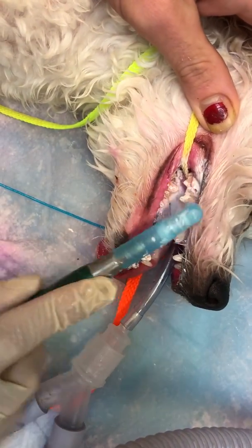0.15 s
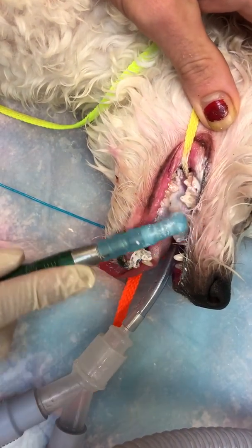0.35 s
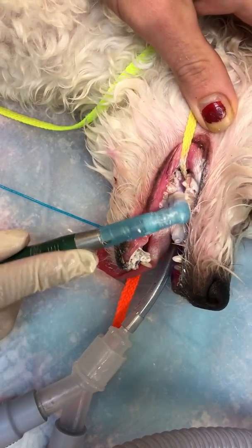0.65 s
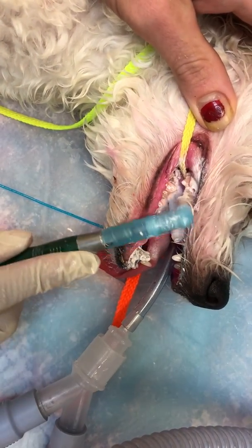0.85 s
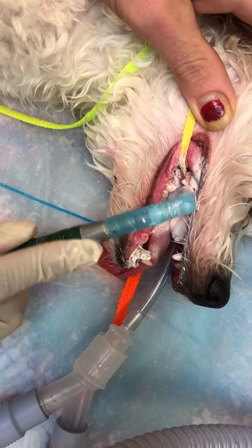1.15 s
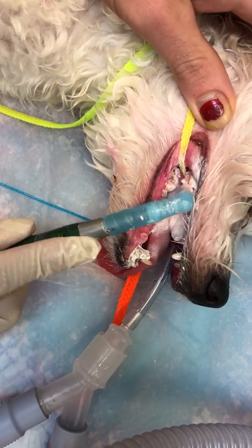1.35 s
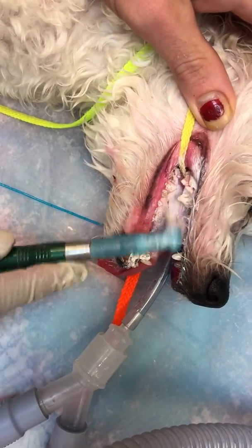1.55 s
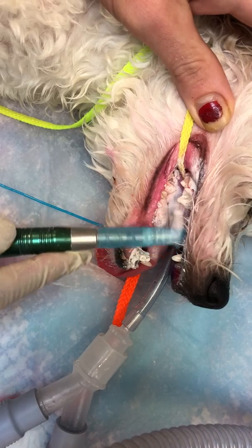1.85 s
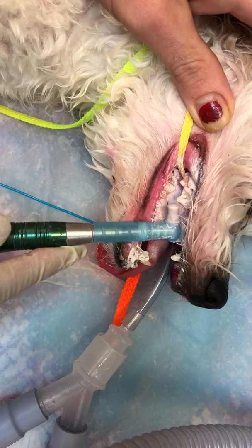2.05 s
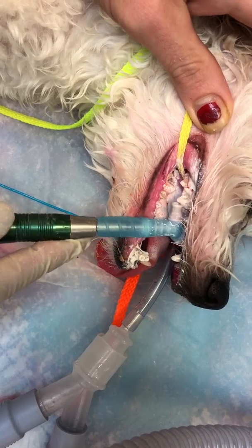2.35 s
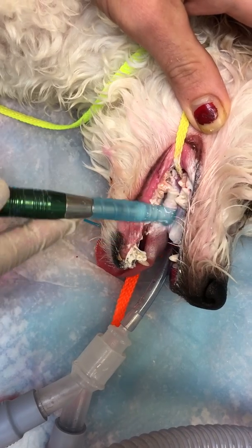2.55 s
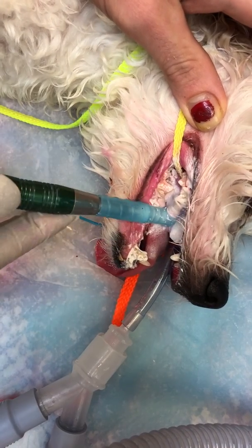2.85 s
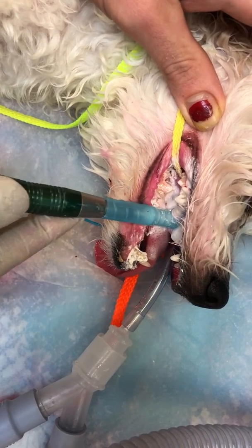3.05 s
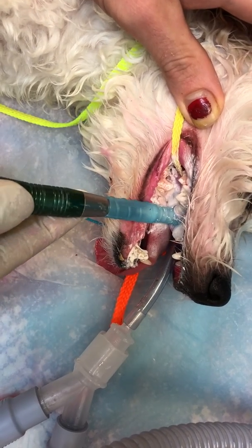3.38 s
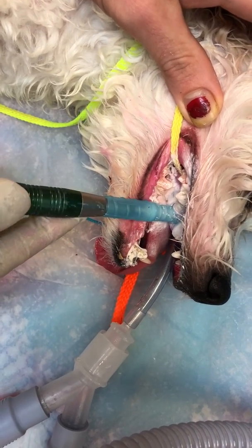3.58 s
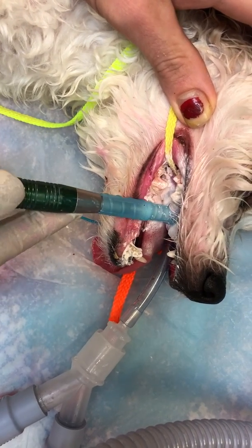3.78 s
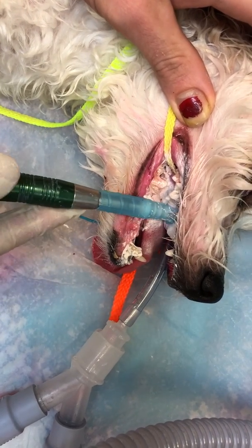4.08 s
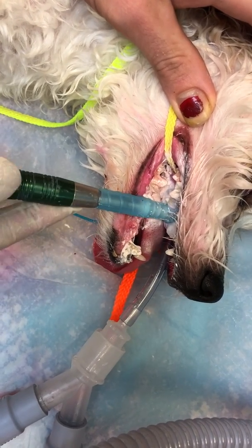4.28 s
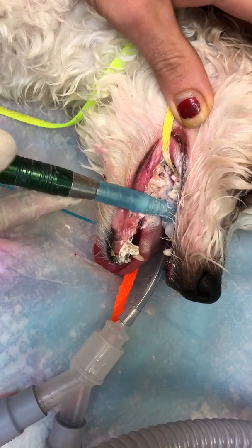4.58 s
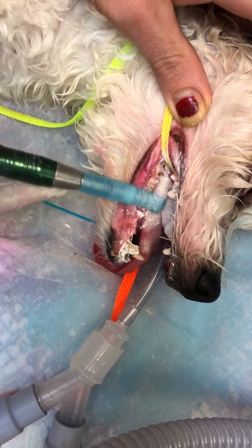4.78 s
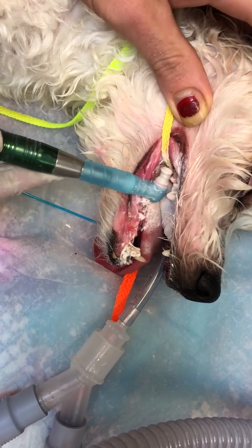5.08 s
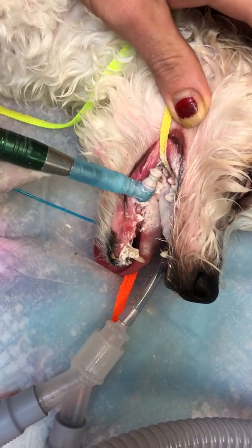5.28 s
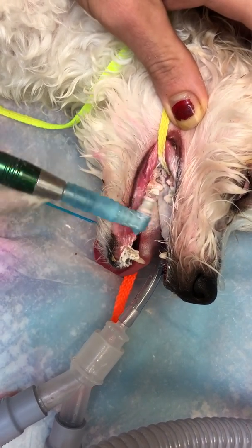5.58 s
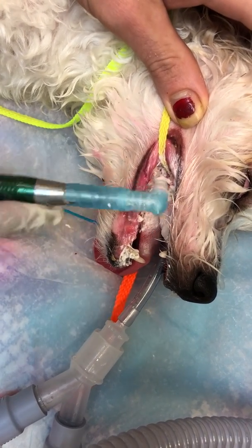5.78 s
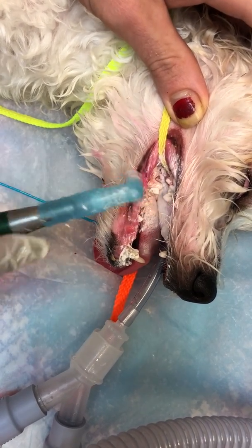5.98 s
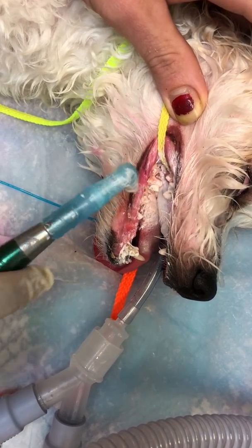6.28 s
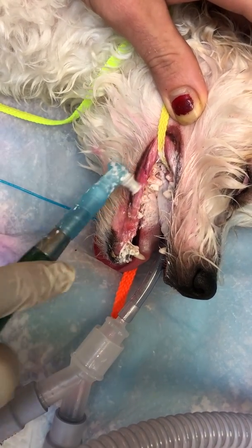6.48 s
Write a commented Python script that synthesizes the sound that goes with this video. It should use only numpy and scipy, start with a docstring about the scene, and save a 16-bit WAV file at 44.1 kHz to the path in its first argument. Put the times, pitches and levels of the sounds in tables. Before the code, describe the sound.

A shrill air-driven dental handpiece whines close by, hissing and buzzing, with fast clattering rasps as its cup presses on teeth over a low equipment hum.

```python
"""Polishing a dog's teeth

An air-driven dental handpiece whines close by: six rotor vanes chop the air, and the pitch sags under load.
Air hisses out and rings the housing, while a gear rocks the rubbing cup to and fro, with clicks
at the reversals. Behind it are a humming pump, mains hum, ventilation noise and a few soft bumps.
Tones are sine waves, hisses are shaped noise, and clicks are short blows sent through ringing bodies."""
import sys
import numpy as np
from scipy import signal
from scipy.fft import rfft, irfft
from scipy.io import wavfile
from scipy.ndimage import uniform_filter1d

SR = 44100
rng = np.random.default_rng(int(sys.argv[2]) if len(sys.argv) > 2 else 0)


def log_audio(samples):
    """Write samples as a 16-bit WAV file to the path given in sys.argv[1]."""
    # one column per channel
    frames = np.atleast_2d(samples).T
    # limit to full scale, then quantise
    limited = np.clip(frames, -1, 1)
    pcm = np.round(limited * 32767).astype(np.int16)
    wavfile.write(sys.argv[1], SR, pcm)


N = 292383
T = np.arange(N) / SR  # time in seconds

VANES, GEAR = 6, 4.75  # vanes on the rotor; rotor turns per rocking cycle of the cup
OUTWARD, RETURN, SLIP = .315, .835, .14  # where the blows fall, as a share of the rocking cycle

# exhaust hiss as the tool is turned in the hand; only its swing about the average is used: (t/s, level/dB)
EXHAUST = [(0.0, -39), (0.59, -40.5), (1.57, -39), (1.75, -42), (2.64, -35), (2.71, -33.5), (3.65, -30),
           (4.23, -31), (4.38, -30.5), (5.1, -32), (5.61, -30), (5.96, -40), (6.41, -37.5), (6.63, -38)]
# housing ring near 7 kHz; only its swing about the average is used: (t/s, level/dB)
RINGING = [(0.0, -31.5), (0.15, -31.5), (0.33, -39.5), (0.42, -33.5), (0.7, -38), (1.57, -33.5),
           (1.81, -44), (2.21, -48), (2.53, -40), (2.92, -29.5), (4.03, -29.5), (4.15, -31), (4.36, -27.5),
           (4.74, -30), (5.04, -34.5), (5.58, -32), (5.78, -42.5), (5.85, -36), (6.37, -33.5),
           (6.44, -43.5), (6.63, -43)]
# colour of the knocking plastic head and the scraping cup: (f/Hz, relative level/dB per Hz)
KNOCK = [(1000, -20.5), (2300, -18), (3300, -15.5), (4100, 1), (4800, 0.5), (5600, -5.5), (7000, -3),
         (10000, -29)]


def amp(db):
    """Turns decibels into gain."""
    return 10 ** (np.asarray(db) / 20)


def unit(x):
    """Scales a signal to an rms (average strength) of 1."""
    return x / np.sqrt(np.mean(x ** 2) + 1e-20)


def curve(rows):
    """Joins a table of (time, value) by straight lines."""
    s, value = np.transpose(rows)
    return np.interp(T, s, value)


def swing(rows):
    """How far a level curve lies above its average, in dB."""
    db = curve(rows)
    return db - db.mean()


def colour(points, hz):
    """Gain of a spectrum at the given frequencies, joined evenly in pitch."""
    f, db = np.transpose(points)
    return amp(np.interp(np.log(hz + 1), np.log(f), db))


def wander(hz):
    """Slow random drift of rms 1, moving up to about hz times a second."""
    count = N // 32 + 2  # computed at every 32nd sample, then filled in
    f = np.fft.rfftfreq(count, 32 / SR)
    slow = irfft(rfft(rng.standard_normal(count)) / (1 + (f / hz) ** 4))
    return unit(np.interp(np.arange(N) / 32, np.arange(len(slow)), slow))


def ring(x, points):
    """Passes x through a body of energy 1 with the given spectrum, which sounds only after each blow."""
    log_gain = np.log(colour(points, abs(np.fft.fftfreq(2048, 1 / SR))))
    # this choice of phase puts the energy as early as possible
    response = np.fft.ifft(np.exp(np.conj(signal.hilbert(log_gain)))).real
    return signal.oaconvolve(x, response / np.linalg.norm(response))[:N]


def noise(points, patchy_db, size=1024):
    """Noise with the given spectrum, mottled by patches that drift over time and frequency."""
    hz = np.fft.rfftfreq(size, 1 / SR)
    a, b, patches = rng.standard_normal((3, N * 4 // size + 5, len(hz)))
    patches = uniform_filter1d(patches, size=40, axis=0)  # smooth in time
    patches = unit(uniform_filter1d(patches, size=10, axis=1))  # smooth in frequency
    z = (a + 1j * b) * colour(points, hz) * amp(patchy_db * patches)
    sound = signal.istft(z.T, nperseg=size, noverlap=size * 3 // 4)[1][:N]
    return sound * np.sqrt(1.5 * SR / size)


def tone(turns, db, waver):
    """A sine partial of random phase; reflections make its strength and phase waver."""
    carrier = np.exp(2j * np.pi * (turns + rng.random()))
    fading = 1 + waver * (wander(hz=8.3) + 1j * wander(hz=20))
    fading = fading / np.sqrt(1 + 2 * waver ** 2)  # keeps the average power
    return np.sqrt(2) * amp(db) * (carrier * fading).real


def ventilation():
    """Moving air makes a steady, mostly low noise."""
    # spectrum before a small boost: (f/Hz, level/dB per Hz)
    room_points = [(25, -100), (45, -92), (60, -73.5), (110, -82), (142, -64.5), (175, -72.5), (270, -77),
                   (350, -77.5), (460, -78.5), (570, -78.5), (830, -79), (1020, -83), (1220, -78.5),
                   (1450, -87), (8000, -89.5)]
    return amp(0.4) * noise(room_points, patchy_db=1.35, size=4096)


def mains_hum():
    """Electrical equipment hums at multiples of the mains frequency."""
    # hum before a small cut: (f/Hz, level/dB)
    hum_partials = [(100, -57), (150, -64), (200, -53.5), (300, -90.5)]
    return amp(-2.0) * sum(tone(hz * T, db, waver=.05) for hz, db in hum_partials)


def pump():
    """A pump hums at whole multiples (orders) of its slightly drifting shaft speed."""
    # hum before a small cut: (order of the shaft speed, level/dB)
    shaft_orders = [(2, -59.5), (3, -69), (4, -48.5), (5, -64.5), (6, -56.5), (7, -63), (8, -45), (9, -47),
                    (10, -43.5), (11, -50.5), (12, -52.5), (13, -56), (14, -64.5), (15, -78.5), (16, -59.5),
                    (17, -65), (18, -67.5), (19, -59.5), (20, -63.5), (21, -56.5), (22, -64), (29, -60.5),
                    (30, -71), (32, -61), (33, -54.5), (34, -58.5), (35, -54), (36, -58.5), (37, -64),
                    (39, -54), (40, -84), (43, -65)]
    shaft_hz = 23.383
    turns = shaft_hz * T + 0.0023 * wander(hz=2.1)
    return amp(-1.15) * sum(tone(k * turns, db, waver=0.17) for k, db in shaft_orders)


def bumps():
    """Dull thuds: bursts of noise that swell quickly and die away, sent through a low body."""
    # soft bumps: (start t/s, level/dB, decay/s)
    bump_rows = [(2.27, -43, .08), (4.95, -30, 0.041), (4.98, -42, .03)]
    # colour of the bumped body: (f/Hz, relative level/dB per Hz)
    thud_points = [(30, -23), (60, 0), (100, -4), (170, -7), (300, -4.5), (420, -16), (1000, -19.5),
                   (2500, -50)]
    push = np.zeros(N)
    for start, db, decay in bump_rows:
        swell = np.clip((T - start) / 0.011, 0, 1)
        push += amp(db) * swell * np.exp(-np.maximum(T - start, 0) / decay)
    return ring(push * rng.standard_normal(N), thud_points)


def escaping_air():
    """Air rushing from the exhaust makes a broad hiss."""
    # colour of the air: (f/Hz, relative level/dB per Hz)
    air_points = [(1000, -23.5), (2000, -8.5), (2750, -18.5), (3400, -7.5), (6000, -3), (7700, -0.5),
                  (8400, 2), (9300, 1), (10000, 0.5), (11000, -1.5), (12300, -1), (13500, -0.5),
                  (16000, -3)]
    return amp(-33.5 + 1.34 * swing(EXHAUST)) * unit(noise(air_points, patchy_db=1.5))


def ringing_housing():
    """The air rings the housing, heard as a narrower hiss near 7 kHz."""
    # colour of the housing: (f/Hz, relative level/dB per Hz)
    housing_points = [(4500, -46), (5600, -15.5), (6200, -1.5), (7000, 4.5), (7600, -2), (8200, -9.5),
                      (9500, -40)]
    level_db = -38.5 + 0.89 * swing(RINGING) + 0.076 * swing(EXHAUST)
    return amp(level_db) * unit(noise(housing_points, patchy_db=-1.0))


def rubbing_cup(turns, knock):
    """The cup rubs, and scrapes when pressed; both swell twice a rocking cycle, first at the outward blow."""
    # colour of the rub: (f/Hz, relative level/dB per Hz)
    rub_points = [(800, -57), (1500, -11), (2200, -4.5), (3000, -4), (3600, -2), (4100, -2.5), (4900, -3),
                  (5600, -7), (6400, -11.5), (8000, -43)]
    on_teeth_s, lifted_db = (0.5, 5.8), -1.5  # the cup rubs less before and after this span
    lifted = 1. * ((T < on_teeth_s[0]) | (T > on_teeth_s[1]))
    lifted = uniform_filter1d(lifted, size=SR // 10)
    rub_db = -41.5 + 0.076 * swing(RINGING) + lifted_db * lifted
    rub = amp(rub_db) * unit(noise(rub_points, patchy_db=2.5))
    scrape = amp(-3.5 + 0.87 * swing(EXHAUST)) * knock * unit(noise(KNOCK, patchy_db=-3.0))
    stroke = 1 + 0.12 * np.cos(4 * np.pi * (turns / GEAR - OUTWARD))
    return (rub + scrape) * stroke


def pressing():
    """Strength of knock, tick and slip: each press on a tooth builds up, holds and lets go."""
    # base levels: (start t/s, length/s, knock level/dB, tick level/dB, slip as a share of the knock 0-1)
    presses = [(.07, 0.067, -40.5, -55, .1), (0.667, 0.04, -37, -40, .1), (0.945, 0.11, -42, -49, .1),
               (1.09, .08, -38.5, -49, .1), (1.356, 0.095, -40, -44, 0.2), (1.485, 0.072, -39.5, -54, 0),
               (2.62, .36, -44.5, -42, .2), (2.995, .15, -41, -52, 0.5), (3.155, 0.28, -36.5, -48, 0.9),
               (3.478, 0.275, -35, -37.5, 0.75), (3.768, .28, -38.5, -39, 1), (4.31, .22, -42, -35.5, 0.2),
               (4.605, 0.25, -42.5, -39, 0), (5.28, 0.22, -49, -51, .2), (5.71, 0.082, -56, -38, .1)]
    grip_s, release_s = .015, .02
    knock, tick, slip = np.zeros((3, N))
    for start, length, knock_db, tick_db, slip_share in presses:
        build_up = np.clip((T - start) / grip_s, 0, 1)
        held = build_up * np.exp(-np.maximum(T - start - length, 0) / release_s)
        knock += amp(knock_db) * held
        tick += amp(tick_db) * held
        slip += amp(knock_db) * slip_share * held
    return knock, tick, slip


def impacts(cycles, place, scatter, uneven_db):
    """One blow in each rocking cycle, a little uneven in time and strength; the rms is about 1."""
    count = np.arange(int(cycles[-1]))
    late, size = rng.standard_normal((600, 2))[:len(count)].T
    at = np.interp(count + place + scatter * late, cycles, np.arange(N)).astype(int)
    train = np.zeros(N)
    train[at] = unit(amp(uneven_db * np.clip(size, -2, 1))) * np.sqrt(N / len(count))
    return train


def rattle(x, decay_s, share):
    """Turns a share of each blow's energy into a short irregular chatter after it."""
    t = np.arange(SR // 40) / SR
    tail = rng.standard_normal(len(t)) * np.exp(-t / decay_s)
    chatter = signal.oaconvolve(x ** 2, tail ** 2 / np.sum(tail ** 2))[:N]
    return np.sqrt(1 - share) * x + np.sqrt(share * abs(chatter)) * rng.standard_normal(N)


def gear_ticks(cycles, tick):
    """The play in the gear closes at each reversal: metal ticks even when idle, and more under load."""
    # colour of the metal: (f/Hz, relative level/dB per Hz)
    tick_points = [(800, -33), (2300, -5), (4000, -0.5), (6500, -12.5), (8000, 1.5), (10500, 3),
                   (12500, 2.5), (14300, 0.5), (16000, 1)]
    idle = amp(-46.5 + 0.37 * swing(RINGING))
    outward = np.hypot(idle, tick)  # idle and load add as energies
    back = np.hypot(amp(2.8) * idle, amp(-4.5) * tick)
    blows = sum(strength * impacts(cycles, place, scatter=.012, uneven_db=3.0)
                for place, strength in [(OUTWARD, outward), (RETURN, back)])
    return amp(2.0) * ring(rattle(blows, decay_s=.0008, share=.6), tick_points)


def head_knocks(cycles, knock, slip):
    """Under load the plastic head knocks at each reversal and the cup slips between them."""
    blows = sum(strength * impacts(cycles, place, scatter=.01, uneven_db=-1.5)
                for place, strength in [(OUTWARD, knock), (RETURN, amp(-9.5) * knock), (SLIP, slip)])
    return amp(-0.09 * swing(EXHAUST)) * ring(rattle(blows, decay_s=0.00062, share=0.31), KNOCK)


def fade(multiple):
    """Brief fades and swells of one partial of the whine as the tool turns, in dB."""
    # (middle t/s, half width/s, multiple of the vane rate, change/dB)
    fades = [(.23, 0.058, 3, 6), (.38, .17, 1, -16), (1.48, 0.14, 2, -4.5), (1.75, 0.073, 1, -15),
             (2.86, .16, 3, 2), (2.0, .09, 4, 5), (3.17, 0.47, 2, -6.5), (3.85, 0.1, 2, -3.5),
             (5.42, 0.33, 4, 8), (5.48, 0.18, 1, 3.5), (5.65, 0.21, 2, 2), (6.31, 0.13, 2, -6.5),
             (6.55, 0.14, 2, 1)]
    return sum(db * np.exp(-((T - s) / width) ** 4)
               for s, width, k, db in fades if k == multiple)


def vane_whine(turns):
    """Six vanes chop the air, making a whine at multiples of the rate at which they pass."""
    # levels at average exhaust and ringing, before fades:
    # (multiple of the vane rate, level/dB, change/dB per dB of exhaust, change/dB per dB of ringing)
    partials = [(1, -46.5, 1.07, -0.1), (2, -39, 0.32, 0.03), (4, -50.5, .6, -.35)]
    # shrill third partial, before fades: (t/s, level/dB)
    shrill_rows = [(0.0, -38), (1.3, -36.5), (1.84, -40), (1.98, -60), (2.24, -55), (2.74, -43),
                   (3.1, -35.5), (3.98, -38), (4.18, -50), (4.42, -38), (4.52, -52), (4.8, -41), (4.9, -58),
                   (5.2, -39.5), (5.42, -37.7), (5.54, -51), (5.64, -35.5), (5.9, -31.2), (6.36, -37.5),
                   (6.62, -49)]
    exhaust, ringing = swing(EXHAUST), swing(RINGING)
    whine = tone(3 * VANES * turns, curve(shrill_rows) + fade(3), waver=.1)
    for k, db, by_exhaust, by_ringing in partials:
        level_db = db + by_exhaust * exhaust + by_ringing * ringing + fade(k)
        whine = whine + tone(VANES * k * turns, level_db, waver=0.13)
    return whine


def vane_buzz(turns):
    """Unequal vanes add a buzz at multiples of the rotor speed, which brightens as the exhaust grows."""
    # strongest near the housing's resonance: (order of the rotor speed, relative level/dB)
    buzz_orders = [(14, -43), (16, -24), (17, -17), (19, -14), (20, -10), (21, -6), (22, -7), (23, -9.5),
                   (26, -39), (30, -15.5), (32, -23), (34, -29), (36, -17), (41, -19), (42, -19)]
    middle_order, tilt_slope = 21, .4  # slope in dB per order per dB of exhaust
    exhaust = swing(EXHAUST)
    buzz = 0
    for k, db in buzz_orders:
        above = k - middle_order
        tilt = tilt_slope * above * np.exp(-(above / 3) ** 2)  # mostly the orders near the middle
        buzz = buzz + tone(k * turns, db + tilt * (exhaust - 2.5), waver=0.38)
    return amp(-37.5 + 1.12 * swing(RINGING) - .2 * exhaust) * buzz


def rotor_turns():
    """Angle of the rotor in turns, slowing as the cup is pressed on, with a tiny random jitter."""
    # pitch of the whine, as vanes passing per second: (t/s, f/Hz)
    pitch = [(0, 2013), (.12, 2001), (.25, 2048), (.57, 2054), (.69, 2033), (.88, 2036), (1.11, 2013),
             (1.17, 2013), (1.21, 2027), (1.26, 2015), (1.3, 2032), (1.35, 2029), (1.38, 2010),
             (1.52, 2006), (1.6, 2032), (2.2, 2030), (2.31, 2003), (2.66, 2010), (2.94, 1986), (3.26, 1976),
             (3.98, 1960), (4.13, 1982), (4.42, 1972), (4.52, 1987), (4.62, 1970), (4.8, 1968),
             (4.96, 2021), (5.5, 2012), (5.86, 2035), (5.94, 2060), (6.39, 2065), (6.45, 2045),
             (6.63, 2041)]
    return np.cumsum(curve(pitch)) / VANES / SR + 0.001 * wander(hz=45.2)


def scene():
    """One rotor angle times the whine, the rubbing and the clicks; both channels are alike."""
    turns = rotor_turns()
    cycles = turns / GEAR
    knock, tick, slip = pressing()
    background = ventilation() + mains_hum() + pump() + bumps()
    air = escaping_air() + ringing_housing()
    cup = rubbing_cup(turns, knock) + gear_ticks(cycles, tick) + head_knocks(cycles, knock, slip)
    mono = background + air + cup + vane_whine(turns) + vane_buzz(turns)
    return np.array([mono, mono])


def record(dry):
    """The recorder's band limit: a steep filter removes the highest treble."""
    edge_hz = 15760
    low_pass = signal.firwin(1023, edge_hz, window=("kaiser", 9), fs=SR)
    return signal.oaconvolve(dry, low_pass[None], "same", axes=1)


dry = scene()
out = record(dry)
log_audio(out)
```